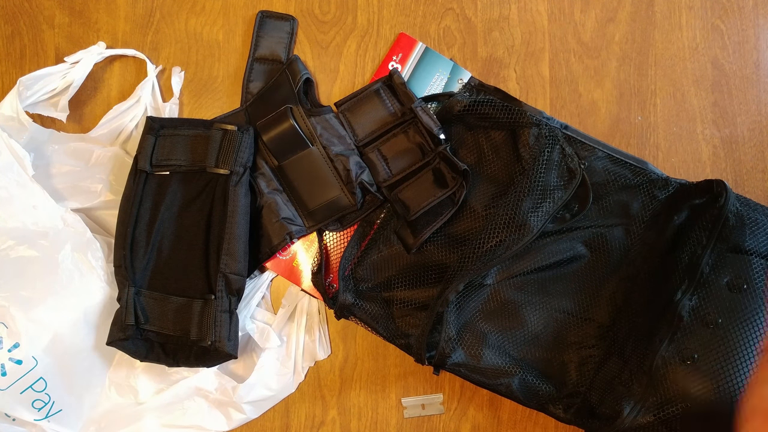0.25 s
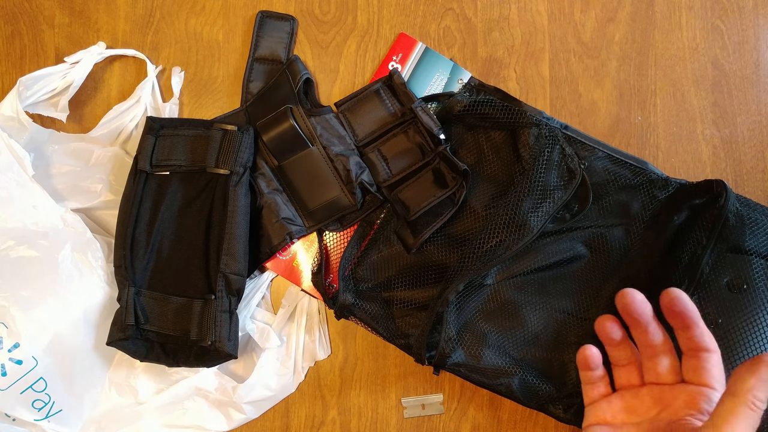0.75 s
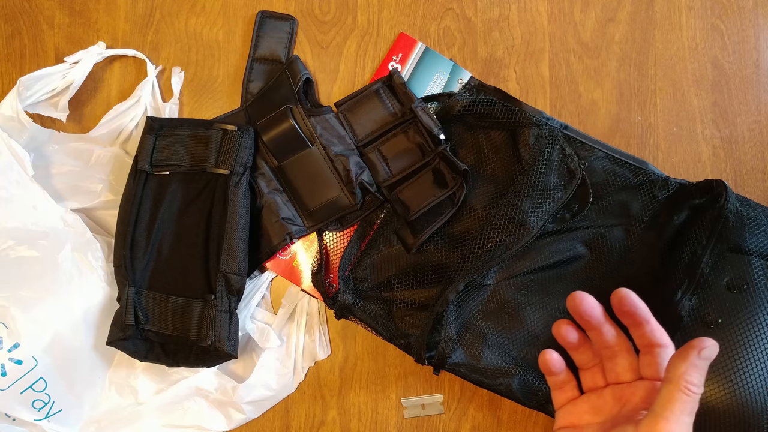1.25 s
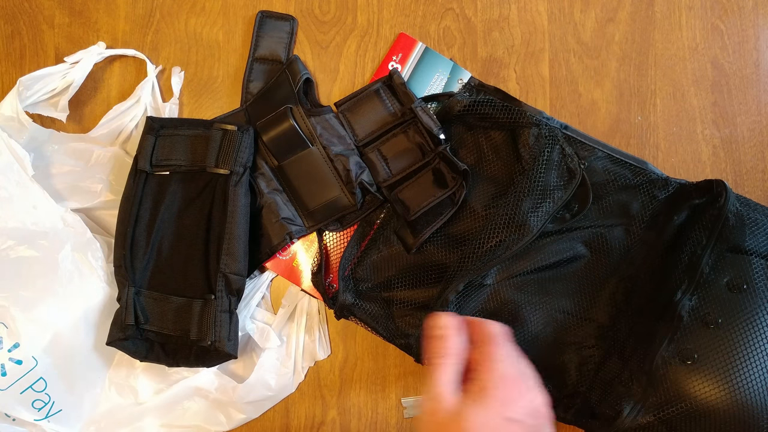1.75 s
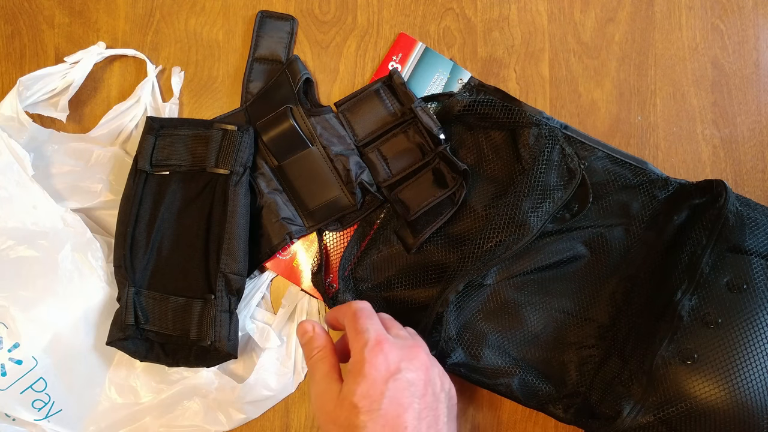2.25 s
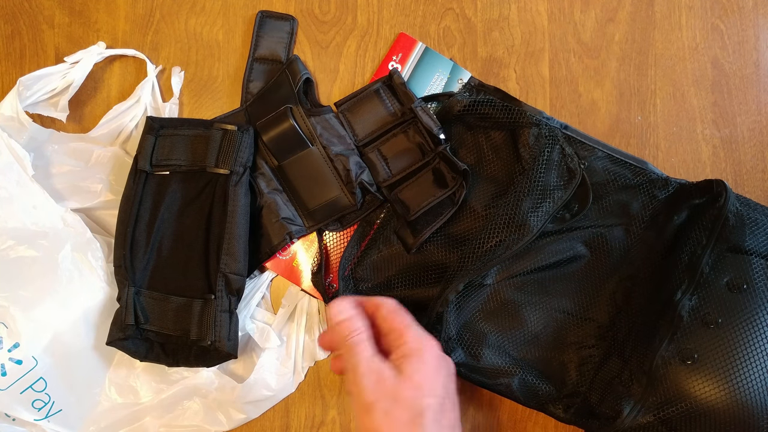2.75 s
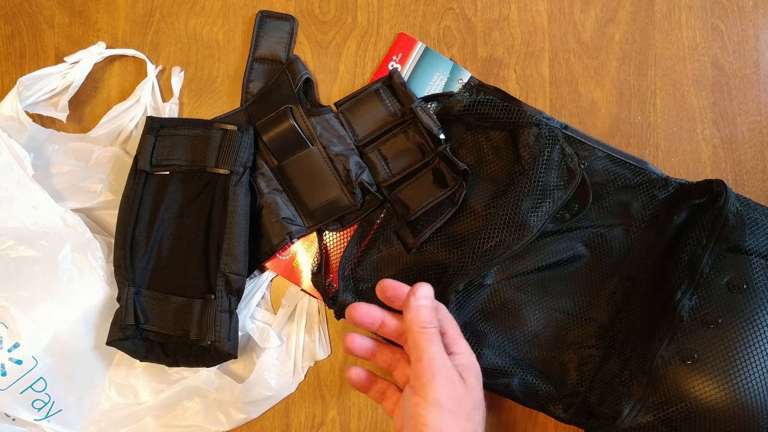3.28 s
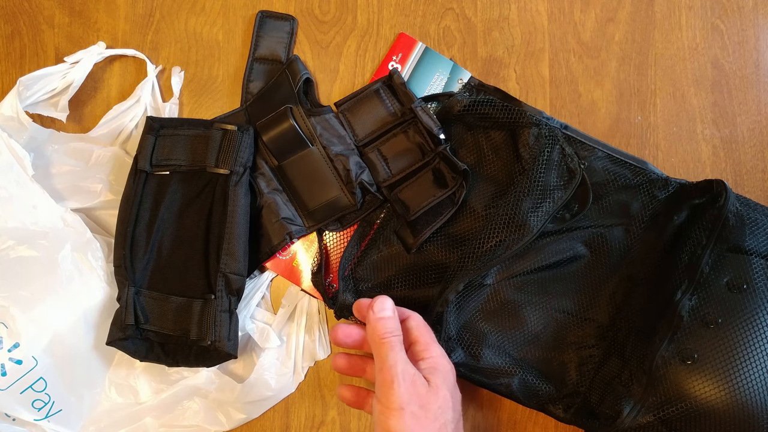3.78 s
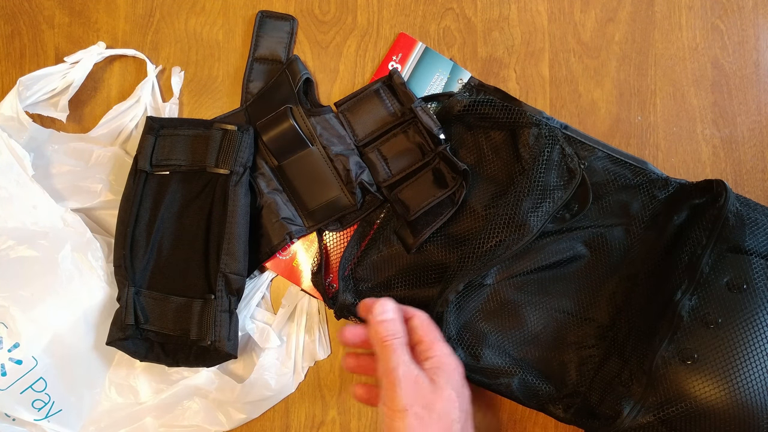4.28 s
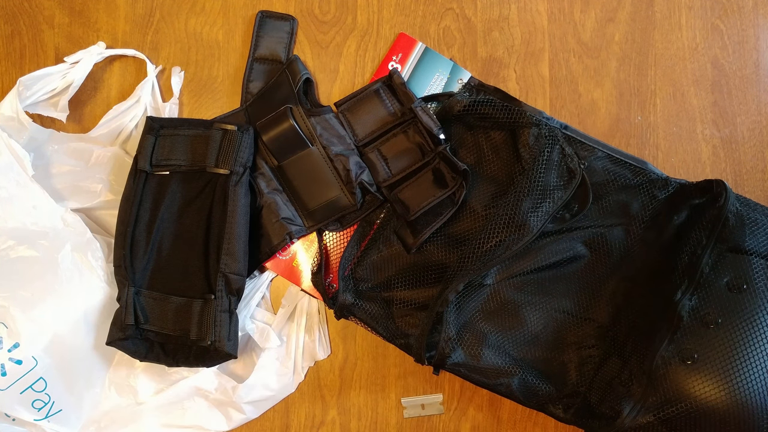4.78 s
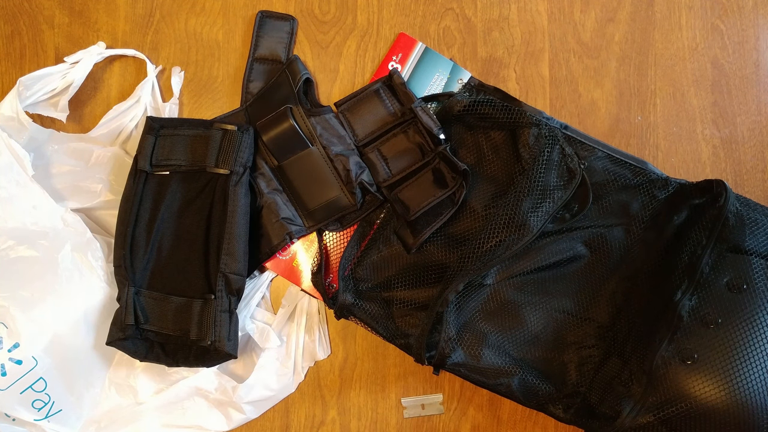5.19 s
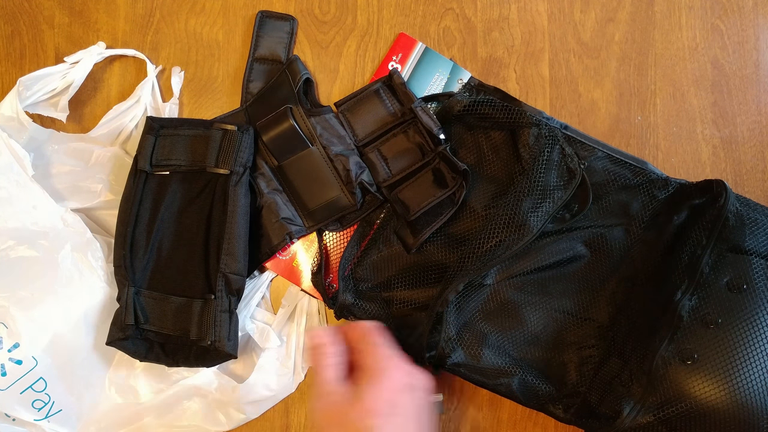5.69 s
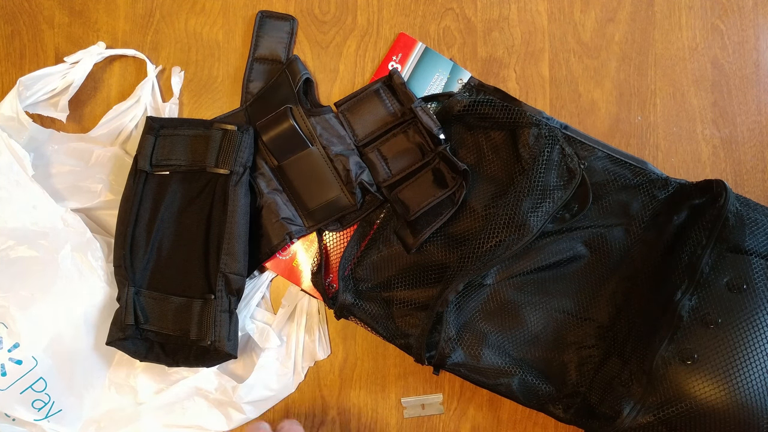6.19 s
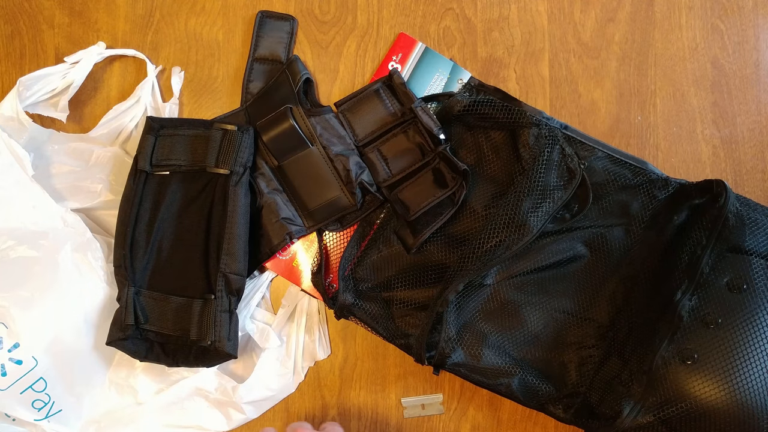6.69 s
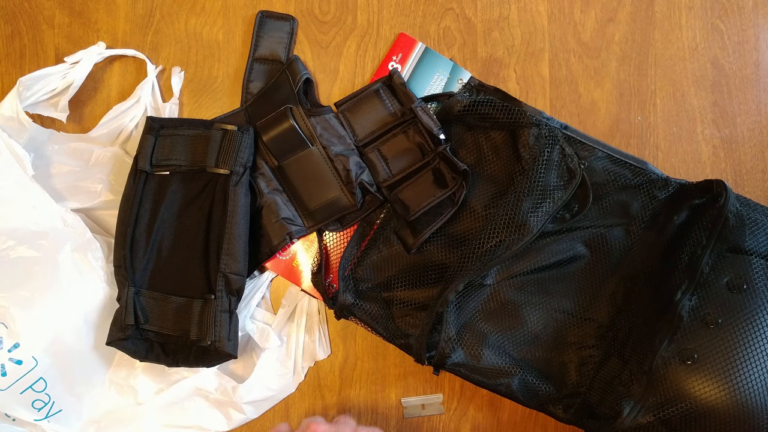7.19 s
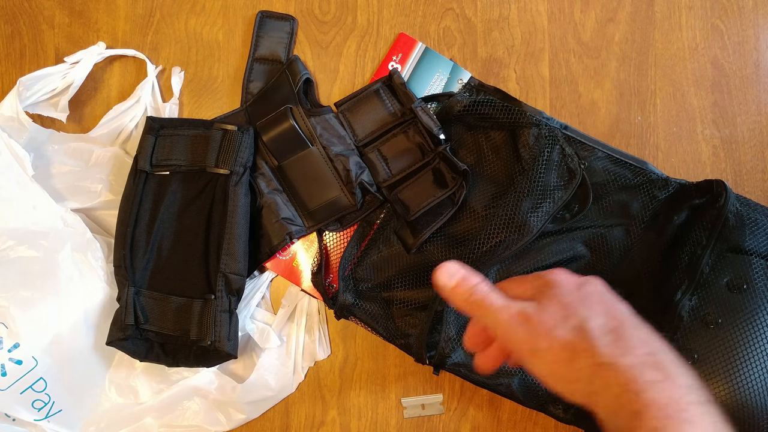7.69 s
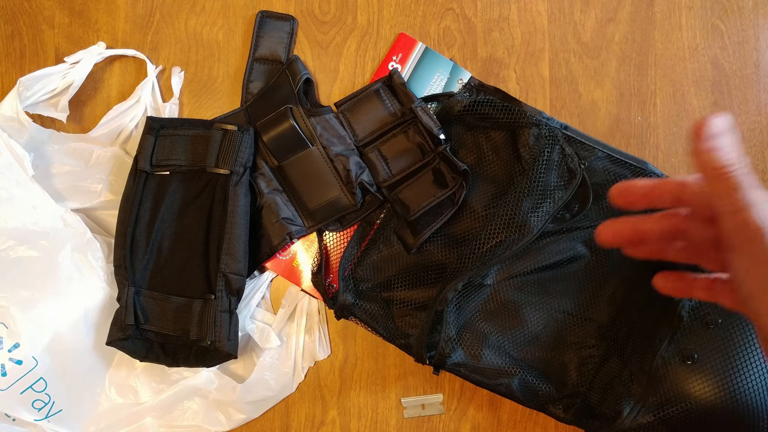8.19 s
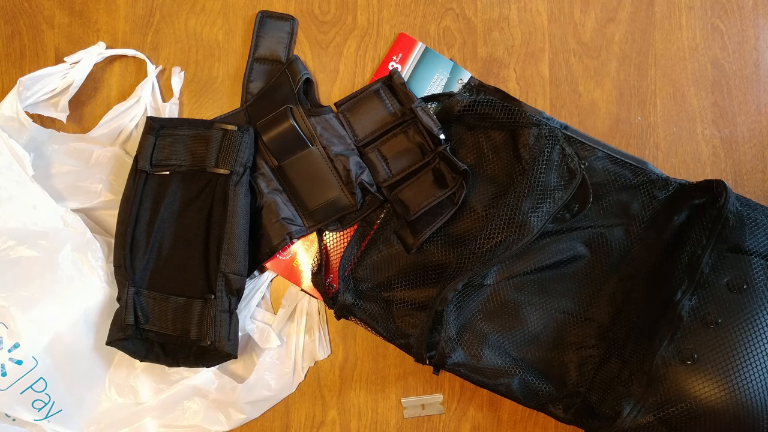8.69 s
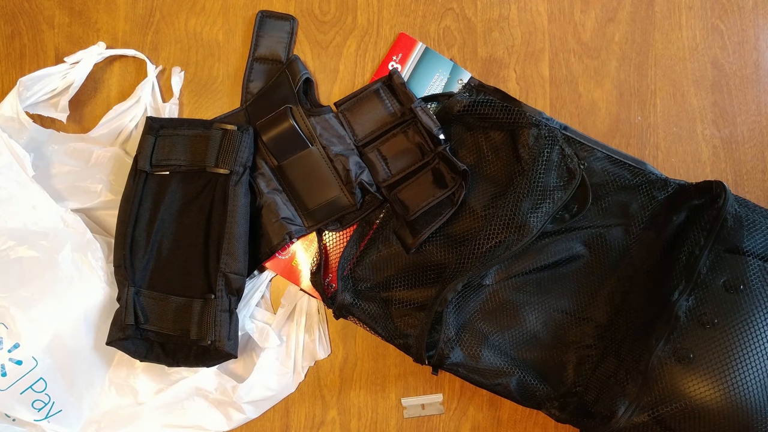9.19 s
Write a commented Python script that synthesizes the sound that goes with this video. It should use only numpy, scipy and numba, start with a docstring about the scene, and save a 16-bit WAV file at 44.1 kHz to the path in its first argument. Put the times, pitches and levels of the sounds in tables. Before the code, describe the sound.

A small quiet room, close stereo microphone, steady faint low hum and soft air throughout. A brief nylon scuff opens at 0 s, followed by very faint cloth stirring. Around 1.5-1.8 s fabric swishes more clearly with a soft padding bump; light stiff ticks come at 2.0 s. At 2.7 s a hook-and-loop strap tears open: a bright, dense, uneven crackling rip, loudest until about 2.9 s, fading quickly, with one last crisp snap at 3.04 s. A tick at 3.3 s and a short scuff at 4.1 s sit in near quiet. From 4.4 s light fabric strokes return, fuller around 5.9-6.0 s and 7.0-7.2 s with soft bumps. A sharp bright click lands at 7.8 s, a swish at 8.3 s, a cluster of hard ticks at 8.8-8.9 s, and a low dull knock at 9.1 s, with rustling to the end near 9.4 s.

```python
"""Hook-and-loop strap torn open

A strap on a protective pad is torn open close to a two-port microphone in a small room. Snaps of single hooks
make the rip, cracks of whole bunches break it up, and a last row parts with a snap. Before and after the rip,
fabric is handled: crackle filtered to a moving pitch swishes stroke by stroke, band-passed pulses tick, and
low bands of grains bump. Two motors hum as wavering sines over soft air noise."""
import sys
import numpy as np
from scipy import signal
from scipy.fft import rfft, irfft
from scipy.io import wavfile
from numba import njit

SR = 44100
rng = np.random.default_rng(int(sys.argv[2]) if len(sys.argv) > 2 else 0)


def log_audio(samples):
    """Write samples as a 16-bit WAV file to the path given in sys.argv[1]."""
    # one column per channel
    frames = np.atleast_2d(samples).T
    # limit to full scale, then quantise
    limited = np.clip(frames, -1, 1)
    pcm = np.round(limited * 32767).astype(np.int16)
    wavfile.write(sys.argv[1], SR, pcm)


N = 416744
T = np.arange(N) / SR

# All levels are relative: before colouring, room and microphone.
# hum of two motors running slightly apart, beating slowly: mean f/Hz, mean level/dB
MOTOR_LINES = [(58.1, -58), (93, -64), (96.8, -61.5), (115.8, -61), (118.0, -58), (173.7, -61),
               (177.1, -63)]
# colour of the still air of the room: f/Hz, gain/dB
AIR_COLOUR = [(20, -30), (38, -20), (55, 1), (75, 0.5), (130, -2), (200, -5), (300, -14), (500, -17),
              (750, -18), (1100, -27), (2000, -32), (5000, -36), (14500, -43)]
# room decay: f/Hz, t60/s
ROOM_DECAY = [(150, 1), (600, 0.25), (2000, 0.2), (5000, 0.22), (12000, 0.21)]
# microphone response; its port rings near 9 kHz: f/Hz, gain/dB
MIC_RESPONSE = [(6500, -0.5), (7600, 0), (8500, 5.5), (9500, 8.5), (10150, -2), (10900, -5), (12000, 1),
                (14500, -2)]
# padding bumps: peak t/s, level/dB, rise/s, fall/s, centre f/Hz, width/octaves
PADDING_BUMPS = [(1.725, -46, 0.023, 0.05, 302, 2.4), (1.78, -48, 0.12, 0.057, 80, 1.93),
                 (5.91, -51.5, 0.11, 0.06, 104, 2.3), (6.94, -49.5, 0.038, 0.052, 126, 1.3),
                 (9.12, -35.5, 0.005, 0.011, 400, 1.46), (9.16, -47, 0.014, 0.019, 476, 1.1),
                 (9.135, -42.5, 0.024, 0.081, 95, 2.16)]
# short scuffs of tape and nylon: peak t/s, level/dB, rise/s, fall/s, centre f/Hz, width/octaves
SCUFF_CONTACTS = [(0.029, -42.5, 0.009, 0.023, 4950, 1.4), (0.50, -61.5, 0.0084, 0.025, 3400, 0.45),
                  (0.60, -63, 0.026, 0.021, 3070, 0.35), (0.665, -61, .012, 0.019, 6340, 0.86),
                  (1.037, -57.5, 0.005, 0.024, 8500, 0.91), (1.353, -58.5, 0.0024, 0.014, 5300, 0.89),
                  (1.478, -59.5, 0.0092, 0.0089, 7000, 1.5), (1.713, -36.5, 0.015, 0.0092, 6000, 1.7),
                  (2.158, -65.5, .002, 0.016, 7000, 1.2), (2.641, -49, 0.0059, 0.012, 7400, 2.7),
                  (2.659, -41, 0.0032, 0.006, 5960, 1.78), (3.04, -34.5, 0.011, 0.0086, 6470, 5.1),
                  (3.265, -61.5, 0.021, 0.089, 2960, 2.4), (3.335, -52.5, .005, 0.0085, 2890, 1.7),
                  (4.135, -53.5, 0.028, 0.052, 8500, 2.6), (4.136, -33, 0.0029, 0.011, 6300, 1.5),
                  (4.139, -45.5, 0.0042, 0.0081, 3100, 0.6), (4.381, -55.5, 0.0023, 0.011, 3460, 0.4),
                  (6.473, -62, .0015, 0.016, 1570, 1.1), (6.652, -57, 0.00091, .008, 1180, 0.88),
                  (7.005, -42, 0.0039, 0.015, 1360, 1.27), (7.314, -55, 0.0047, 0.012, 5700, 1.2),
                  (7.42, -52.5, 0.018, 0.037, 2400, 0.59), (7.71, -54, 0.024, .025, 2740, 0.69),
                  (7.772, -51, 0.034, 0.022, 3300, 0.38), (8.729, -68.5, .001, .02, 1500, 2.3),
                  (8.872, -46.5, 0.021, 0.013, 2400, 2.6)]
# ticks and knocks of the stiff strap and shell: t/s, peak level/dB, centre f/Hz, width/octaves
STIFF_TICKS = [(1.980, -36, 3020, 1.45), (2.006, -27, 2650, 1.7), (2.017, -27, 2610, 2),
               (2.155, -40, 4500, 2), (3.256, -43, 2840, 0.44), (3.325, -24, 3100, 1.4),
               (4.379, -42, 4500, 2.3), (4.972, -39, 1100, 2.2), (6.470, -49, 1600, 1.5),
               (6.651, -54, 1200, 1.2), (6.848, -48, 1490, 2), (7.404, -29, 2080, 1.0),
               (7.7952, -19.5, 1330, 1.54), (7.7954, -13, 6630, 0.84), (8.729, -43.5, 1375, 1.1),
               (8.823, -34.5, 2670, 1.1), (8.845, -24, 1900, 1.05), (8.859, -26, 2220, 0.44),
               (8.871, -21, 2050, 1.5), (9.104, -26, 745, 1.6), (9.116, -28, 420, 1.15)]
# fabric over fabric, one row a stroke:
# t of top speed/s, rise/s, fall/s, level/dB, padding rub level/dB, weave ribs at top speed/(1/s)
FABRIC_STROKES = [(0.12, 0.014, 0.03, -47.5, -58.5, 3650), (0.316, .02, 0.013, -60, -56.5, 1700),
                  (0.55, 0.14, 0.081, -65.5, -89, 4100), (0.945, .015, 0.0092, -70.5, -77, 3400),
                  (1.135, .018, 0.011, -66, -81, 3500), (1.548, 0.014, 0.025, -49.5, -64, 3570),
                  (1.66, 0.026, 0.047, -44.5, -50, 3150), (1.716, 0.011, 0.015, -48, -45, 1700),
                  (1.778, 0.021, 0.01, -48, -54.5, 2750), (2.01, 0.019, 0.0098, -50.5, -57.5, 2700),
                  (2.19, 0.016, 0.014, -65.5, -76, 4100), (4.385, 0.015, .02, -59.5, -84, 4000),
                  (4.51, .03, 0.034, -54.5, -77.5, 4000), (4.67, 0.046, 0.023, -65.5, -62.5, 2700),
                  (4.885, .01, 0.019, -63.5, -59, 2600), (4.961, 0.015, 0.044, -59.5, -54.5, 2230),
                  (5.14, 0.014, 0.02, -52.5, -56.5, 3100), (5.278, 0.02, 0.032, -58.5, -62, 3300),
                  (5.55, 0.017, .04, -57, -60, 3640), (5.61, 0.011, 0.0087, -64, -55, 1300),
                  (5.71, 0.0091, 0.011, -77, -58.5, 1600), (5.81, 0.12, 0.07, -66, -67.5, 2400),
                  (5.941, 0.02, .03, -51.5, -53, 3100), (6.005, .02, 0.026, -53.5, -57.5, 2700),
                  (6.30, 0.023, 0.013, -61.5, -58, 5500), (6.41, .028, 0.018, -68, -59, 1040),
                  (6.52, 0.026, 0.034, -55.5, -58, 1480), (6.58, 0.017, 0.0075, -64, -51, 1300),
                  (6.67, 0.0055, 0.0094, -87, -57, 4600), (6.735, 0.017, 0.016, -64.5, -65, 4800),
                  (6.871, 0.014, 0.019, -61.5, -58, 6000), (6.92, 0.026, 0.025, -72, -58, 2400),
                  (7.029, 0.023, 0.022, -50, -50, 2500), (7.191, 0.032, 0.023, -52, -55.5, 3300),
                  (7.30, 0.032, 0.038, -59.5, -61, 2950), (7.43, 0.026, 0.03, -58.5, -65, 3000),
                  (7.637, 0.021, 0.022, -56.5, -63.5, 2500), (7.785, 0.029, 0.017, -50, -58.5, 2800),
                  (8.06, 0.047, 0.022, -64.5, -75, 3800), (8.215, 0.019, 0.056, -52, -82, 3750),
                  (8.312, 0.034, 0.023, -44.5, -59, 3200), (8.46, 0.046, 0.031, -63, -68, 3900),
                  (8.969, 0.067, 0.041, -58.5, -63, 2270), (9.155, 0.034, 0.046, -48, -50, 3140),
                  (9.29, 0.061, 0.039, -53.5, -58.5, 2050)]
# held cloth stirring between strokes: start t/s, end t/s, mean level/dB
CLOTH_STIRRING = [(0.0, 0.66, -69.5), (0.713, 2.62, -80), (4.355, 9.45, -74)]
# colour of the fabric hiss: f/Hz, gain/dB
HISS_COLOUR = [(2000, -26.5), (4000, -2.5), (5200, 1), (7000, -1.5), (9500, -0.5), (14500, -5.5)]
# colour of the padding rub: f/Hz, gain/dB
RUB_COLOUR = [(40, -41.5), (120, -22), (300, -1), (650, -1.5), (1000, -1.5), (1600, -5), (2400, -17),
              (6000, -29.5)]
# strength of the pull on the strap: t/s, mean level/dB
STRAP_PULL = [(2.70, -70.5), (2.733, -46), (2.764, -22.5), (2.785, -25), (2.806, -22), (2.825, -26.5),
              (2.88, -27.5), (2.935, -38.5), (3.01, -62)]
# bunches of hooks that let go together: t/s, level over 1 ms/dB, spread/ms
HOOK_BUNCHES = [(2.737, -13, .25), (2.743, -18.5, .6), (2.7550, -14, .35), (2.7631, -16.5, 0.32),
                (2.7706, -15.5, 1.46), (2.776, -14, 0.7), (2.7823, -19.5, 0.91), (2.7985, -16, 0.37),
                (2.8042, -18.5, 1.7), (2.812, -19.5, 1.2), (2.8394, -13, 0.92), (2.8433, -15, .4),
                (2.8541, -19, 0.32), (2.866, -19.5, 0.56), (2.8724, -16, 1.5), (2.9115, -30, 0.59),
                (2.9166, -25.5, 0.53), (2.9372, -26, 0.18), (2.9848, -34.5, .15), (3.0431, -10.5, .95),
                (7.7953, -33, 1.14)]
# colour of the hook tape: f/Hz, gain/dB
HOOK_COLOUR = [(300, -44.5), (1500, -30.5), (2300, -11), (2900, 0.5), (3900, -1.5), (5400, 2.5),
               (7000, 2.5), (8300, 4), (11000, 0), (14500, -2.5)]
# ringing of the stiff tape backing: f/Hz, gain/dB
BACKING_COLOUR = [(200, -58.5), (650, -35.5), (1100, -12), (1650, -2.5), (2100, -6.5), (2800, 1.5),
                  (3400, 0.5), (4200, -2), (5000, -13.5), (5900, -0.5), (7000, -18), (12000, -45)]
# colour of the pad under the tape: f/Hz, gain/dB
PAD_COLOUR = [(30, -28), (70, -6), (150, -1), (250, -11), (350, -5.5), (520, -4.5), (630, 4), (850, -3),
              (1300, 0.5), (2400, -6.5), (5000, -23), (12000, -37.5)]

TOP_HZ = 14600
# fabric: pitch sags as a stroke slows; high-ribbed strokes hiss more than they rasp
PITCH_SAG_SHARE, USUAL_RIBS_HZ = 0.184, 2820
RASP_DB, RASP_DB_PER_OCTAVE = -2, -11
# the peel line crosses most of the tape; a last row holds on and snaps later
PEEL_START_S, PEEL_END_S = 2.733, 2.97
# hook rate at the reference pull, and the rise in pull that doubles it
HOOKS_PER_S, PULL_REF_DB, DOUBLING_DB = 2500, -23, 14
# the tape holds and gives in small jerks
JERK_DB, JERKS_PER_S = 1.46, 420
# the freed flap rings louder as it grows: gain at peel end, rise per doubling of length
FLAP_DB, FLAP_DB_PER_DOUBLING = 9, 4.5


def undb(db):
    """Decibels to gain."""
    return np.exp(np.asarray(db) * (np.log(10) / 20))


def unit(x):
    """Scale to rms 1."""
    return x / np.sqrt(np.mean(x ** 2) + 1e-18)


def colour(x, points, size=1024):
    """Minimum-phase filter through (f/Hz, gain/dB) points, from the cepstrum of the log gain."""
    hz, db = np.transpose(points)
    grid_hz = np.maximum(np.arange(size // 2 + 1) * SR / size, 1)
    gain_db = np.interp(np.log(grid_hz), np.log(hz), db)
    cepstrum = irfft(np.log(undb(gain_db)))
    # fold to the causal side
    cepstrum[1:size // 2] *= 2
    cepstrum[size // 2 + 1:] = 0
    response = irfft(np.exp(rfft(cepstrum)))
    return signal.oaconvolve(x, response[None], axes=1)[:, :x.shape[1]]


def band(x, hz, octaves):
    """Band-pass of a given width around a centre, its edges capped."""
    edges_hz = hz * 2 ** (np.array([-.5, .5]) * octaves)
    edges_hz = np.minimum(edges_hz, [SR / 3, SR / 2 - 1000])
    return signal.sosfilt(signal.butter(2, edges_hz, "band", fs=SR, output="sos"), x + 1e-18)


def highpass(x, hz):
    """First-order high-pass."""
    return signal.sosfilt(signal.butter(1, hz, "high", fs=SR, output="sos"), x)


@njit
def resonance(x, hz, width):
    """State-variable band-pass with a moving centre; width is a share of the centre."""
    y, b, low = np.empty(len(x)), 0., 0.
    for i in range(len(x)):
        g = np.tan(np.pi * hz[i] / SR)
        v = (b + g * (x[i] - low)) / (1 + g * (g + width))
        b, low, y[i] = 2 * v - b, low + 2 * g * v, width * v
    return y


def add(out, s, x):
    """Mix a short sound in at time s."""
    i = int(s * SR)
    out[:, i:i + x.shape[1]] += x[:, :N - i]


def walk(rate):
    """Slow random control with a spread near 1; rate in points per s."""
    step = int(SR / rate)
    count = N // step + 2
    return 1.2 * np.interp(T, np.arange(count) * step / SR, rng.standard_normal(count))


def snaps(at, size, length, lag_samples=1.3):
    """Impulses, each from its own spot, so it meets the two ports a little apart."""
    out = np.zeros((2, length))
    lag = np.round(lag_samples * rng.standard_normal(len(at))).astype(int)
    np.add.at(out[0], np.clip(at, 0, length - 1), size)
    np.add.at(out[1], np.clip(at + lag, 0, length - 1), size)
    return out


def crackle(rate, scatter_db, lag_samples=1.6):
    """Random stream of snaps of uneven size, scaled so its level does not follow the rate; rms 1."""
    share = np.clip(rate / SR, 1e-4, 1) * np.ones(N)
    at = np.flatnonzero(rng.random(N) < share)
    sign = rng.choice([-1, 1], len(at))
    size = sign * undb(scatter_db * rng.standard_normal(len(at)).clip(-2, 2))
    return unit(snaps(at, size / np.sqrt(share[at]), N, lag_samples))


def background(waver_hz=0.695, waver_db=2.0):
    """Motor lines waver in pitch and level over air noise; its bass is much alike at both ports."""
    hum = np.zeros(N)
    for hz, db in MOTOR_LINES:
        level = undb(db + waver_db * walk(5.1))
        phase = 2 * np.pi * np.cumsum(hz + waver_hz * walk(9)) / SR
        hum += level * np.sqrt(2) * np.sin(phase)
    mid, side = rng.standard_normal((2, N))
    side = 0.055 * side + 0.93 * highpass(side, 450)
    air = colour(mid + np.array([side, -side]), AIR_COLOUR, size=8192)
    return hum + undb(-57.5) * unit(air)


def room(x, early_db=-9, tail_db=-5, gap_s=0.0039):
    """Pad and table scatter the sound at once; the walls answer with a short tail."""
    t = T[:SR // 2]
    hz, t60_s = np.transpose(ROOM_DECAY)
    f, when, cells = signal.stft(rng.standard_normal((2, len(t))), SR)
    decay = np.exp(-np.log(1000) * when / np.interp(np.log(f + 1), np.log(hz), t60_s)[:, None])
    tail = signal.istft(cells * decay, SR)[1][:, :len(t)] * (t > gap_s)
    # long waves reach both ports alike
    side = highpass(tail[1], 300)
    tail = tail[0] + np.array([side, -side])
    early = rng.standard_normal((2, len(t))) * np.exp(-t / 0.0029)
    response = (undb(early_db) * unit(early) + undb(tail_db) * unit(tail)) / np.sqrt(len(t))
    return x + signal.oaconvolve(x, response, axes=1)[:, :N]


def contacts(table, grains):
    """Brief contacts: a band of grains swells and dies away."""
    out = np.zeros((2, N))
    for s, db, rise_s, fall_s, hz, octaves in table:
        span = slice(max(int((s - .2) * SR), 0), int((s + .5) * SR))
        t = T[span] - s
        swell = np.exp(np.where(t < 0, -.5 * (t / rise_s) ** 2, -t / fall_s))
        out[:, span] += unit(band(grains[:, span], hz, octaves)) * swell * undb(db)
    return out


def bumps():
    """The padding bumps: grains spread wide between the ports, in low bands."""
    return contacts(PADDING_BUMPS, crackle(3000, scatter_db=4.5, lag_samples=14.0))


def scuffs():
    """Tape and nylon scuff: dense grains nearly alike at both ports."""
    return contacts(SCUFF_CONTACTS, crackle(4000, scatter_db=3.5, lag_samples=0.84))


def ticks(chatter_db=-19, chatter_s=0.00077, onset_lag_s=0.001058, size=1024):
    """A stiff part gives way at once and chatters for an instant; the cloth damps its ring."""
    out = np.zeros((2, N))
    for s, db, hz, octaves in STIFF_TICKS:
        chatter = rng.standard_normal((2, size)) * np.exp(-T[:size] / chatter_s)
        pulse = band(signal.unit_impulse(size) + undb(chatter_db) * chatter, hz, octaves)
        add(out, s + onset_lag_s, undb(db) * pulse / np.abs(pulse).max())
    return out


def sliding(stir_rub_db=-0.5, stir_wander_db=3, fade_s=0.034):
    """Strokes speed up and slow down, moving loudness and pitch: gain, rub gain, ribs per s."""
    t = T[::SR // 500]
    stir = np.zeros(len(t))
    for start_s, end_s, db in CLOTH_STIRRING:
        outside_s = np.abs(t - np.clip(t, start_s, end_s))
        stir += undb(db) * np.exp(-outside_s / fade_s)
    stir = stir * undb(stir_wander_db * np.interp(t, T, walk(12))) + 1e-9
    power = stir ** 2
    rub_power = (stir * undb(stir_rub_db)) ** 2
    pitch_sum = power * USUAL_RIBS_HZ
    for s, rise_s, fall_s, db, rub_db, ribs_hz in FABRIC_STROKES:
        away = np.exp(np.where(t < s, (t - s) / rise_s, (s - t) / fall_s))
        speed = 2 * away / (1 + away ** 2)
        stroke = (undb(db) * speed) ** 2
        power = power + stroke
        rub_power = rub_power + (undb(rub_db) * speed) ** 2
        pitch_sum = pitch_sum + stroke * ribs_hz * (1 - PITCH_SAG_SHARE * (1 - speed))
    # pitch is the power-weighted mean
    controls = np.sqrt(power), np.sqrt(rub_power), pitch_sum / power
    return [np.interp(T, t, control) for control in controls]


def fabric(rasp_width=1.0, hiss_db=-0.24, rub_db=0.5, crease_db=-13):
    """Threads catch and slip; the weave rasps at a pitch set by sliding speed; creases flip at random."""
    gain, rub_gain, ribs_hz = sliding()
    rasp_gain = gain * undb(RASP_DB + RASP_DB_PER_OCTAVE * np.log2(ribs_hz / USUAL_RIBS_HZ))
    threads = crackle(2200, scatter_db=-1.0, lag_samples=2.7)
    once = [resonance(port, ribs_hz, rasp_width) for port in threads]
    rasp = np.array([resonance(port, ribs_hz, rasp_width) for port in once])
    hiss = colour(crackle(7000, scatter_db=2.5), HISS_COLOUR)
    rub = colour(crackle(500, scatter_db=2.0, lag_samples=8.9), RUB_COLOUR)
    creases = unit(band(crackle(35, scatter_db=1), hz=1992, octaves=4.3))
    swish = rasp_gain * unit(rasp) + gain * undb(hiss_db) * unit(hiss)
    padding = rub_gain * (undb(rub_db) * unit(rub) + undb(crease_db) * creases)
    # the grip wavers as the cloth folds
    return (swish + padding) * undb(2.1 * walk(70))


def peeled(s):
    """How far the peel line has run by time s, as a share of its path, kept at 1 % or more."""
    return np.clip((s - PEEL_START_S) / (PEEL_END_S - PEEL_START_S), 1e-2, 1)


def bunch(spread_ms, length, count=40):
    """Hooks let go almost together: a crack with the energy of 1 ms at rms 1."""
    scatter, size = rng.standard_normal((2, count))
    at = (length / 2 + scatter * spread_ms * SR / 1000).astype(int)
    spectrum = rfft(snaps(at, size, length, lag_samples=0.97))
    # flatten the spectrum part way, so that each crack is even in colour and level
    crack = irfft(spectrum / (np.abs(spectrum) + 1e-9) ** .75, length)
    return unit(crack) * np.sqrt(SR / 1000 / length)


def strap(hook_db=5.0, size=1024):
    """Hooks slip out in a stream that shakes the pad, most in mid-peel; bunches rattle the freed backing."""
    pull_db = np.interp(T, *np.transpose(STRAP_PULL), left=-200, right=-200)
    pull_db = pull_db + JERK_DB * walk(JERKS_PER_S)
    # a harder pull frees more hooks
    rate = HOOKS_PER_S * 2 ** ((pull_db - PULL_REF_DB) / DOUBLING_DB)
    hooks = crackle(rate, scatter_db=3.5) * undb(pull_db)
    pad = hooks * np.sin(np.pi * peeled(T))
    backing = np.zeros((2, N))
    for s, db, spread_ms in HOOK_BUNCHES:
        flap_db = FLAP_DB + FLAP_DB_PER_DOUBLING * np.log2(peeled(s))
        start_s = s - size / 2 / SR
        add(hooks, start_s, bunch(spread_ms, size) * undb(db))
        add(backing, start_s, bunch(spread_ms, size) * undb(db + flap_db))
    tape = colour(hooks, HOOK_COLOUR) + colour(pad, PAD_COLOUR)
    return undb(hook_db) * tape + colour(backing, BACKING_COLOUR)


def scene():
    """Everything the hands do sounds near the middle, in the same room, over the background."""
    hands = bumps() + scuffs() + ticks() + fabric() + strap()
    balance_db = np.array([[-.5], [.4]])
    return background() + room(hands) * undb(balance_db)


def record(dry):
    """The microphone colours the sound and rounds the highest peaks; a steep low-pass cuts the top."""
    rounded = np.tanh(1.15 * colour(dry, MIC_RESPONSE)) / 1.15
    return signal.sosfilt(signal.ellip(10, .2, 70, TOP_HZ, fs=SR, output="sos"), rounded)


dry = scene()
out = record(dry)
log_audio(out)
```